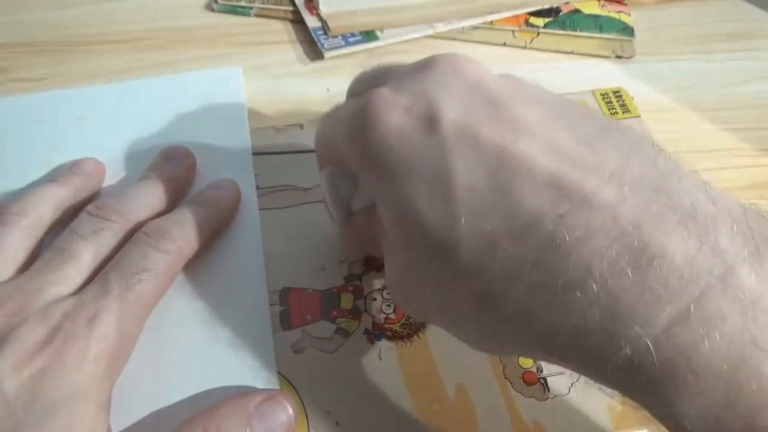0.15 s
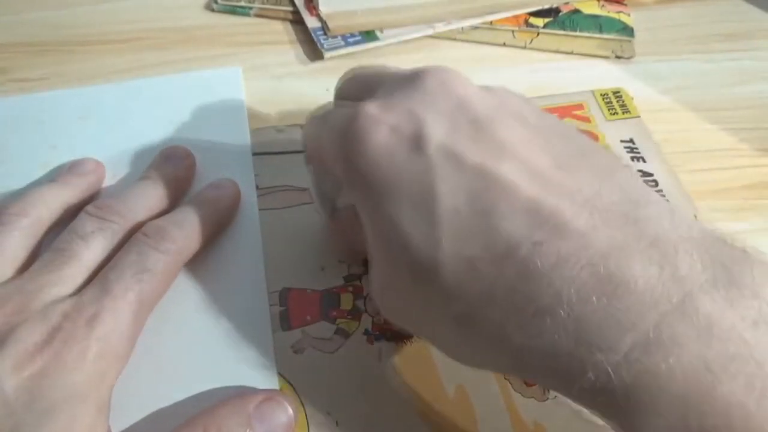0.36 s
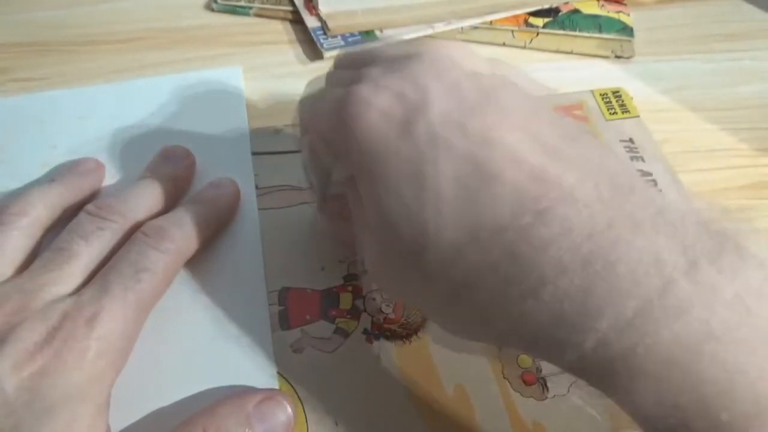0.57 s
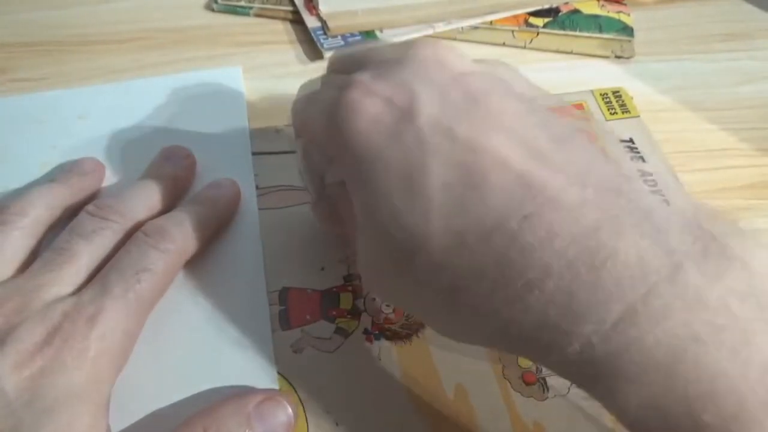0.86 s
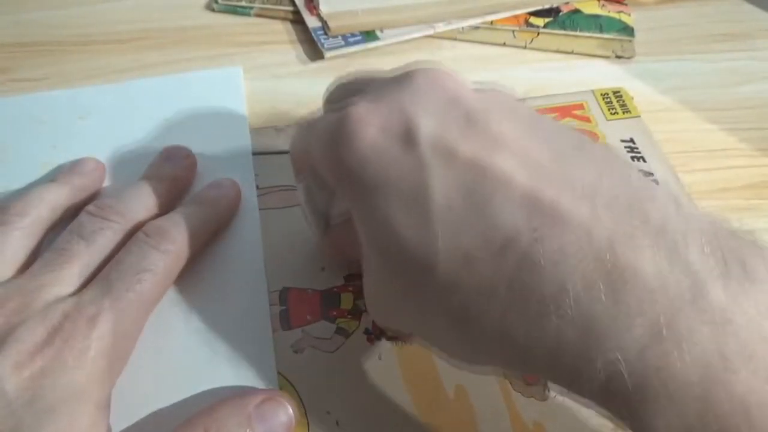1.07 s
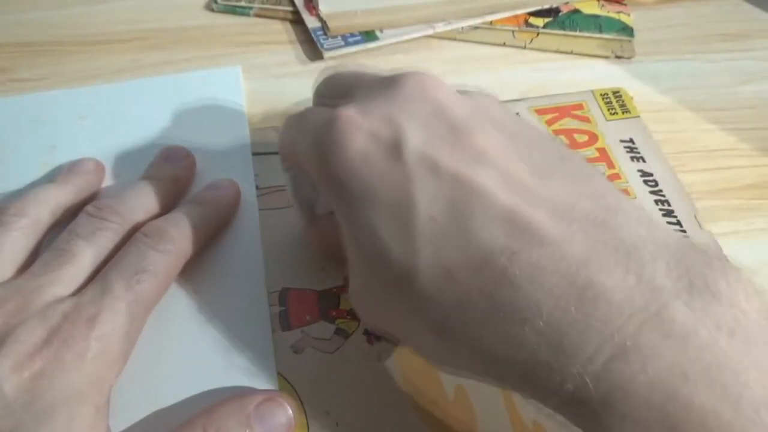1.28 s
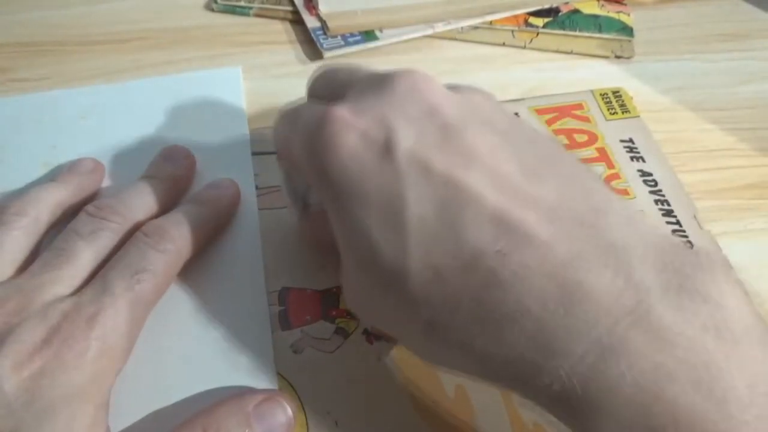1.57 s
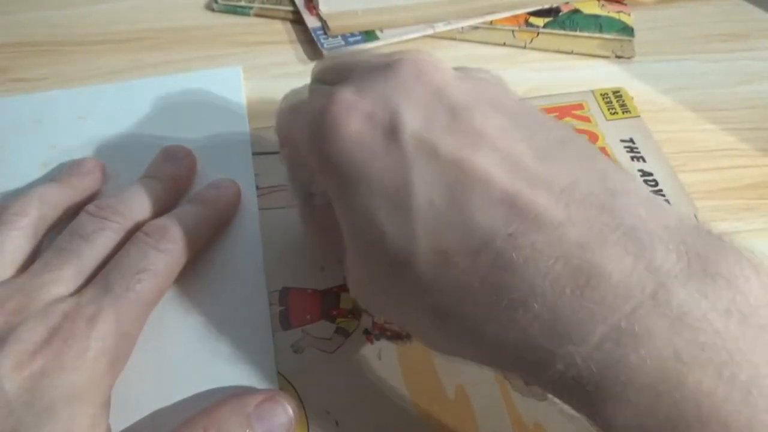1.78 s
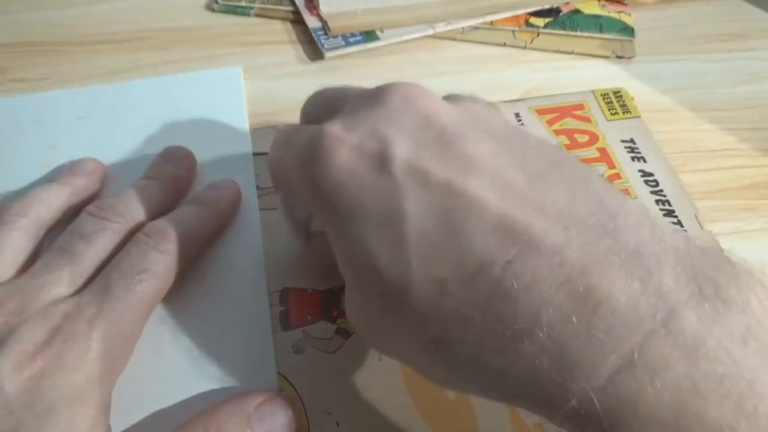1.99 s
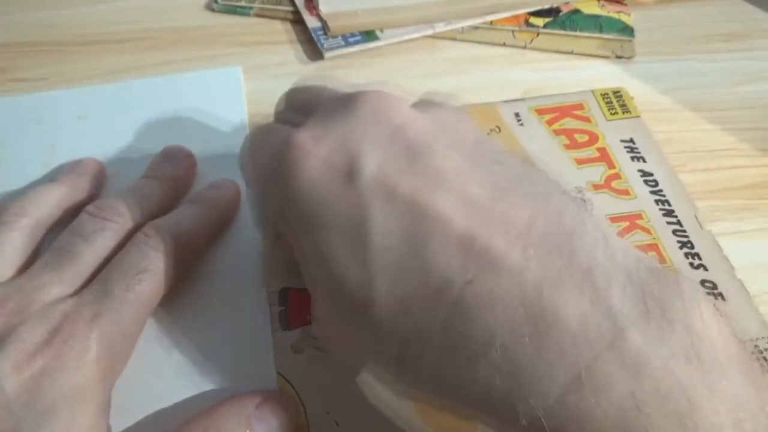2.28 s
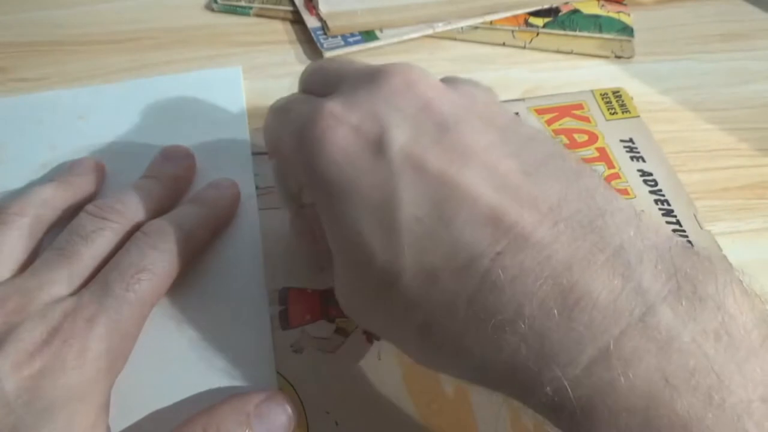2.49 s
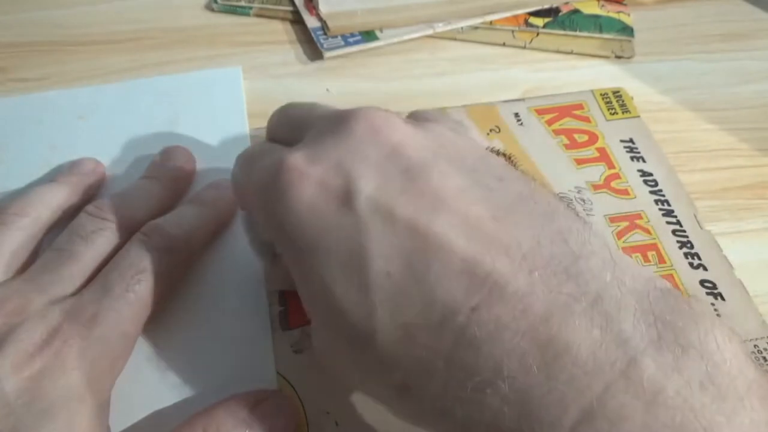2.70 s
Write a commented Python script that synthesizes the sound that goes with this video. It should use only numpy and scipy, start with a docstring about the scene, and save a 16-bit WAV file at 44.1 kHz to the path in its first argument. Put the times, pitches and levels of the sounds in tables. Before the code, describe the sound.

An eraser scrubs a paper cover on a wooden desk, nine even raspy strokes at three a second, each followed by a tiny scuff, with faint desk shudder, close to a camera microphone in a small quiet room.

```python
"""An eraser scrubs a paper cover on a wooden desk, about three strokes a second, close to a camera microphone.
Each cycle has a light touch-down, a pressed stroke and a short scuff as the hand turns back, all cut from
a rasp of tiny random rubber slips over hiss. Decaying low sines make the desk shudder under the hand.
Behind are a short echo of a small furnished room, its quiet noise, a low hum and a faint pulsing whine;
under one stroke the cover murmurs, noise in two low resonances."""
import sys
import numpy as np
from scipy import signal
from scipy.fft import rfft, irfft, next_fast_len
from scipy.io import wavfile
from scipy.ndimage import uniform_filter1d, map_coordinates

SR = 44100
rng = np.random.default_rng(int(sys.argv[2]) if len(sys.argv) > 2 else 0)


def generate_wav(signal):
    """Clip the signal to [-1, 1] and save it as 16-bit WAV at the path in sys.argv[1]."""
    frames = np.transpose(np.atleast_2d(signal))
    scaled = np.clip(frames, -1, 1) * 32767
    pcm = np.round(scaled).astype(np.int16)
    wavfile.write(sys.argv[1], SR, pcm)


N = 125685
T = np.arange(N) / SR  # seconds


def amp(db):
    """Decibels to gain."""
    return 10 ** (np.asarray(db) / 20)


def unit(x):
    """Scale to rms 1."""
    return x / np.sqrt(np.mean(x ** 2) + 1e-20)


def along(points, hz):
    """Read (frequency_hz, value) points at hz, on a log frequency axis."""
    f, v = np.transpose(points)
    return np.interp(np.log(hz + 1), np.log(f + 1), v)


def wobble(rate):
    """A smooth random curve with rate knots a second."""
    return map_coordinates(rng.standard_normal(4096), [T * rate], mode="wrap")


def filtered(x, response):
    """Multiply the spectrum of x by a response of frequency."""
    m = next_fast_len(N + SR // 2)
    hz = np.fft.rfftfreq(m, 1 / SR)
    return irfft(rfft(x, m) * response(hz), m)[..., :N]


def stereo(pair, spectrum, alike):
    """Colour two unrelated signals and blend them into left and right, rms 1."""
    def mid_side_gains(hz):
        turn = np.arccos(np.clip(along(alike, hz), -1, 1)) / 2
        return amp(along(spectrum, hz)) * [np.cos(turn), np.sin(turn)]

    mid, side = filtered(pair, mid_side_gains)
    return unit(np.array([mid + side, mid - side]))


def tilted(x, tilt_db):
    """Brighten or dull by so many dB an octave above 700 Hz, rms 1."""
    return unit(filtered(x, lambda hz: amp(tilt_db * np.log2(np.maximum(hz, 700) / 5000))))


def swell(middle, half):
    """A soft bell of level; half is the time in seconds from its middle to 1/e."""
    return np.exp(-((T - middle) / half) ** 2)


# colour of the quiet room around the microphone: frequency_hz, relative_density_db (per Hz)
ROOM_SPECTRUM = [(15, -41), (25, -9), (145, -5), (422, -13), (531, -13.5), (721, -14.5), (884, -13),
                 (1080, -18), (1300, -14.5), (2050, -20.5), (2510, -20.5), (2930, -16.5), (3240, -22),
                 (11000, -28.5), (14300, -66), (22000, -120)]
# how alike the room sounds at left and right: frequency_hz, correlation (-1 to 1)
ROOM_LIKENESS = [(60, 0.94), (140, 0.98), (350, 0.66), (1000, 0.22), (8000, 0.55)]
ROOM_DB = -55.5


def room_noise():
    """Steady wide noise of the room, coloured and partly shared between left and right."""
    return amp(ROOM_DB) * stereo(rng.standard_normal((2, N)), ROOM_SPECTRUM, ROOM_LIKENESS)


# short rises of the hum near the start: middle_s, half_length_s, peak_level_db
HUM_RISES = [(0.257, 0.016, -51.5), (.312, 0.015, -50)]
HUM_HZ, HUM_DB, HUM_WAVER_DB = 135.8, -72.5, 4


def hum():
    """A low sine, wavering in level and phase, that swells twice near the start."""
    level = amp(HUM_DB + HUM_WAVER_DB * wobble(10))
    level = level + sum(amp(db) * swell(middle, half) for middle, half, db in HUM_RISES)
    return level * np.sin(2 * np.pi * HUM_HZ * T + 0.7 * wobble(15))


WHINE_DB, WHINE_HZ, WHINE_SAG_HZ_PER_S = -66, 2916, 1800
WHINE_ROUGH_RAD = 0.32  # random phase that roughens the tone
PULSES_PER_S, FIRST_PULSE_S, PULSE_HALF_S = 29.97, .004, 0.0051


def whine():
    """A faint, slightly rough tone pulsing about thirty times a second, each pulse sagging in pitch."""
    out = np.zeros(N)
    for middle in np.arange(FIRST_PULSE_S, N / SR, 1 / PULSES_PER_S):
        size, width, pitch, start_phase = rng.standard_normal(4)
        t = T - middle
        # the half makes the pitch itself fall at the sag rate
        cycles = (WHINE_HZ + 20 * pitch - WHINE_SAG_HZ_PER_S * t / 2) * t + start_phase
        tone = np.sin(2 * np.pi * cycles + WHINE_ROUGH_RAD * wobble(250))
        out += amp(1.5 * size) * swell(middle, PULSE_HALF_S * np.exp(.15 * width)) * tone
    return amp(WHINE_DB) * unit(out)


# broad colour of the rasp: frequency_hz, relative_density_db (per Hz)
RASP_SPECTRUM = [(320, -53), (550, -24), (622, -26), (749, -11), (912, -13), (947, -10), (1390, -5.5),
                 (1690, -6.5), (1840, -9.5), (1980, -6.5), (2160, -12), (2570, -8), (2740, -9.5),
                 (2980, -2), (3170, -4), (3370, -6), (4110, -3), (4710, -3.5), (5600, -6.5), (6570, -5),
                 (8100, -0.5), (8940, -7.5), (9630, -4), (10500, -7), (13600, -42), (22000, -120)]
# how alike the rasp is at left and right: frequency_hz, correlation (-1 to 1)
RASP_LIKENESS = [(500, 0.99), (1500, 0.94), (3000, 0.97), (4500, 0.95), (8000, 0.99)]
# lean of the rasp between the sides: frequency_hz, left_over_right_db
RASP_BALANCE = [(60, 0.0), (97, 0.0), (160, -0.5), (250, -1), (410, 2), (660, 3), (1060, 0), (1710, 0.5),
                (2760, 0), (4450, 0), (7190, 1), (11600, -2.5)]
# narrow dips and peaks of the rasp: centre_hz, half_width_hz, gain_db
RASP_FEATURES = [(2810, 67, -7), (8370, 120, -0.5), (10970, 330, 4.5)]
SLIPS_PER_S, SLIP_SCATTER_DB = 5000, 2
HISS_DB = -2.5  # smooth hiss under the slips, relative to them
PATCHY_DB = 1.5  # how far the colour shifts


def friction():
    """Dense slips of rubber on paper fibres; the colour shifts as the eraser travels."""
    happens = rng.random(N) < SLIPS_PER_S / SR
    slips = happens * rng.choice([-1, 1], N) * amp(SLIP_SCATTER_DB * rng.standard_normal(N))
    grain = unit(unit(slips) + amp(HISS_DB) * rng.standard_normal(N))
    pair = np.array([grain, rng.standard_normal(N)])

    # random patches of gain, smooth over neighbouring frequencies and moments
    z = signal.stft(pair, nperseg=512)[2]
    patches = uniform_filter1d(rng.standard_normal(z.shape[1:]), size=3, axis=0)
    patches = uniform_filter1d(patches, size=9, axis=1)
    pair = signal.istft(z * amp(PATCHY_DB * unit(patches)), nperseg=512)[1][:, :N]

    def fine_colour(hz):
        features = sum(db * np.exp(-((hz - centre) / width) ** 2) for centre, width, db in RASP_FEATURES)
        return amp(features + np.outer([.5, -.5], along(RASP_BALANCE, hz)))

    return filtered(stereo(pair, RASP_SPECTRUM, RASP_LIKENESS), fine_colour)


SCUFF_GRIT_DB, SCUFF_GRIT_PER_S = 0.54, 810  # light contact catches unevenly


def gritted(rasp):
    """Make the rasp of light contact flutter quickly in level."""
    return rasp * amp(SCUFF_GRIT_DB * wobble(SCUFF_GRIT_PER_S))


def scuffs(gritty, rows):
    """Light contacts: a bell of gritty rasp for each table row."""
    return sum(tilted(gritty, tilt_db) * amp(db) * swell(middle, half) for middle, half, db, tilt_db in rows)


# the eraser touches down before a stroke: middle_s, half_length_s, level_db, treble_tilt_db_per_octave
TOUCH_DOWNS = [(.021, 0.013, -53, -2.5), (0.347, 0.019, -52, -4), (0.662, 0.017, -52, -3),
               (0.96, 0.015, -47.5, -3), (1.275, 0.015, -43.5, -2.5), (1.593, 0.013, -45, -3.5),
               (1.911, 0.018, -48, -2.5), (2.254, 0.018, -43.5, -1.5), (2.614, 0.021, -43, -1)]


def touch_downs(rasp):
    """The eraser lands lightly on the cover, a brief gritty contact before each stroke."""
    return scuffs(gritted(rasp), TOUCH_DOWNS)


DESK_HZ, DESK_T60_S, DESK_RISE_S = 47, 0.42, .02
DESK_TOUCH_DB = -2.5  # sway from the touch-down, relative to the push
BUMP_HZ, BUMP_HALF_S, BUMP_DB = 60, 0.0053, -2.5  # dull bump, level relative to the push


def sway(start):
    """The desk top swings at its low resonance, a sine that rises fast and dies away."""
    t = np.maximum(T - start, 0)
    hz = DESK_HZ * (1 + 0.041 * rng.standard_normal())
    return amp(-60 * t / DESK_T60_S) * (1 - np.exp(-t / DESK_RISE_S)) * np.sin(2 * np.pi * hz * t)


def desk():
    """Every touch-down bumps and sways the desk, and the push that follows sways it again."""
    out = np.zeros(N)
    for (start, *_, push_db), (touch, half, *_) in zip(PRESSED_STROKES, TOUCH_DOWNS):
        bump = swell(touch - half / 2, BUMP_HALF_S) * np.sin(2 * np.pi * (BUMP_HZ * T + rng.random()))
        landing = amp(DESK_TOUCH_DB) * sway(touch - half) + amp(BUMP_DB) * bump
        out += amp(push_db) * (sway(start) + landing)
    return out


# pressed strokes of the eraser: start_s, length_s, level_db, treble_tilt_db_per_octave, low_rasp_db,
# grip_won_at_once (share 0-1), desk_push_db
PRESSED_STROKES = [(.055, 0.13, -29.5, -0.5, -4, .4, -46), (0.382, 0.13, -30.5, -0.06, -1.5, 0.8, -50),
                   (0.696, 0.12, -30.5, 0.5, -1, 0.74, -44), (0.991, 0.13, -30.5, 1, 2, 0.72, -46.5),
                   (1.307, .14, -31, 0, 0.5, 0.79, -46), (1.621, 0.14, -31.5, 1, 1, .8, -51),
                   (1.942, 0.14, -31, 0.5, 0, 0.83, -49.5), (2.273, 0.17, -29.5, 0, -2, 1, -48.5),
                   (2.616, 0.18, -29, -1, -4.5, 0.25, -56)]
BITE_S, PRESS_S = 0.0047, 0.021  # the rubber grips at once, then the pressure builds
SLOWING, FADE = 3.81, 0.99  # powers of the hand's slowing toward the end of a stroke
CREEP_DB, CREEP_HALF_S = -50, 0.0093  # the rubber creeps around the moment it bites
DRAG_DB, DRAG_HALF_S = -53.5, 0.028  # light contact while the hand stands nearly still
LOW_RASP_EDGE_HZ = 3580


def strokes(rasp):
    """Each stroke bites, holds and fades as the hand slows."""
    out = np.zeros((2, N))
    for start, length, db, tilt_db, low_db, bite, _ in PRESSED_STROKES:
        t = np.maximum(T - start, 0)
        progress = np.minimum(t / length, 1)
        grip = bite * (1 - np.exp(-(t / BITE_S) ** 2)) + (1 - bite) * (1 - np.exp(-t / PRESS_S))
        pressed = amp(db) * grip * (1 - progress ** SLOWING) ** FADE
        creep = amp(CREEP_DB) * swell(start, CREEP_HALF_S)
        drag = amp(DRAG_DB) * swell(start + length, DRAG_HALF_S)

        sound = tilted(rasp, tilt_db)
        low = filtered(sound, lambda hz: 1 / (1 + (hz / LOW_RASP_EDGE_HZ) ** 6))
        # the low rasp gains 2 dB over the stroke
        sound = sound - low + low * amp(low_db - 3 + 2 * progress)
        out += sound * (pressed + creep + drag)
    return out


# the eraser scuffs as the hand turns back: middle_s, half_length_s, level_db, treble_tilt_db_per_octave
TURN_BACKS = [(0.211, 0.012, -42, -1.5), (0.532, 0.0077, -44.5, 1.5), (0.834, 0.0094, -42.5, -1),
              (1.15, 0.013, -40.5, 0), (1.466, 0.0067, -41.5, -1), (1.789, .011, -42.5, 0.5),
              (2.109, 0.014, -41, -1.5), (2.472, 0.014, -44, -2.5), (2.83, 0.02, -41, -2)]


def turn_backs(rasp):
    """The eraser scuffs the cover as the hand turns back, a short gritty contact."""
    return scuffs(gritted(rasp), TURN_BACKS)


ECHO_T60_S, ECHO_RISE_S, ECHO_DB = 0.19, 0.0064, -16


def echo(x):
    """The short answer of a small furnished room: x smeared by decaying noise."""
    t = np.arange(SR // 2) / SR
    tail = rng.standard_normal((2, len(t))) * amp(-60 * t / ECHO_T60_S) * (1 - np.exp(-t / ECHO_RISE_S))
    tail = tail / np.linalg.norm(tail[0])
    return amp(ECHO_DB) * signal.fftconvolve(x, tail, axes=1)[:, :N]


# low resonances of the cover, heard softly under one stroke: centre_hz, level_db
COVER_RESONANCES = [(310, -58), (530, -60.5)]
MURMUR_MIDDLE_S, MURMUR_HALF_S, RESONANCE_HALF_WIDTH_HZ = 1.635, 0.04, 40


def cover():
    """A soft hollow murmur of the rubbed cover: friction noise in two low resonances."""
    def band(centre):
        response = lambda hz: 1 / (1 + ((hz - centre) / RESONANCE_HALF_WIDTH_HZ) ** 2)
        return unit(filtered(rng.standard_normal(N), response))

    murmur = sum(amp(db) * band(hz) for hz, db in COVER_RESONANCES)
    return murmur * swell(MURMUR_MIDDLE_S, MURMUR_HALF_S)


PAN_DB, PAN_DB_PER_S = -0.15, 0.55  # left over right: the sound drifts slightly left


def scene():
    """Eraser and desk close by, with the room behind them."""
    light_rasp = friction()
    pressed_rasp = friction()
    eraser = touch_downs(light_rasp) + strokes(pressed_rasp) + turn_backs(light_rasp)
    eraser = eraser * amp(np.outer([.5, -.5], PAN_DB + PAN_DB_PER_S * T))
    background = room_noise() + hum() + whine()
    return background + eraser + echo(eraser) + desk() + cover()


TOP_HZ = 11030


def record(dry):
    """The camera microphone keeps almost nothing above its steep band limit."""
    return filtered(dry, lambda hz: 1 / np.sqrt(1 + (hz / TOP_HZ) ** 700))


dry = scene()
out = record(dry)
generate_wav(out)
```